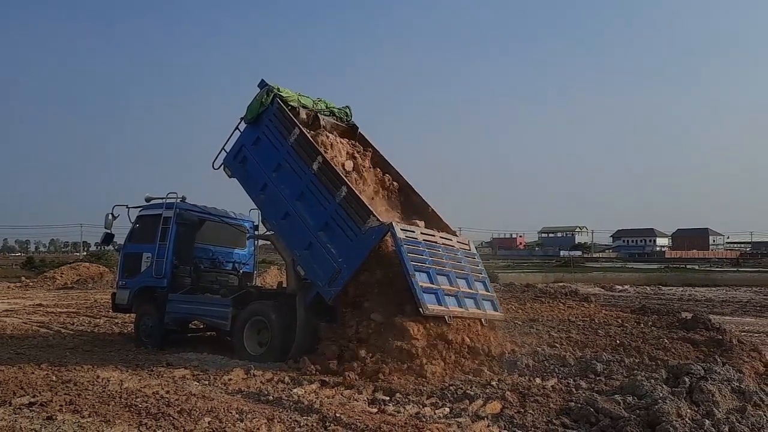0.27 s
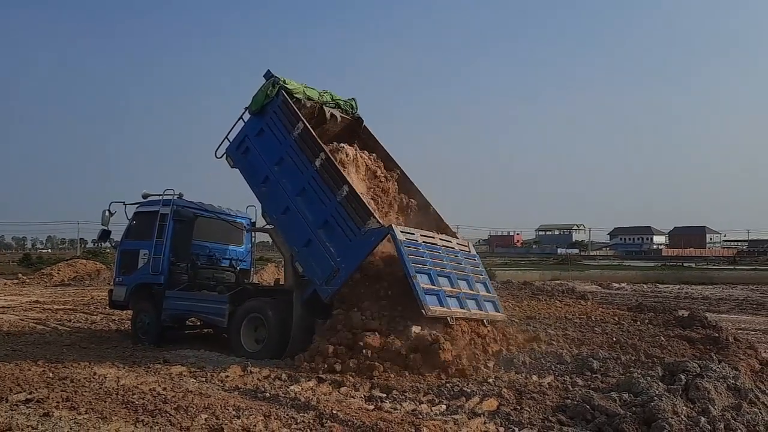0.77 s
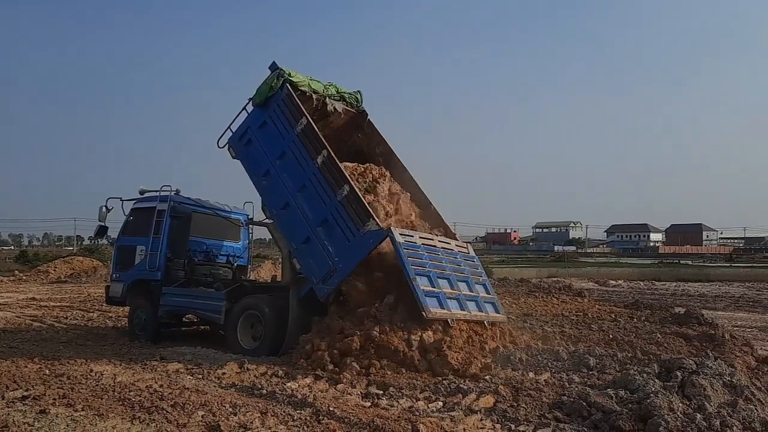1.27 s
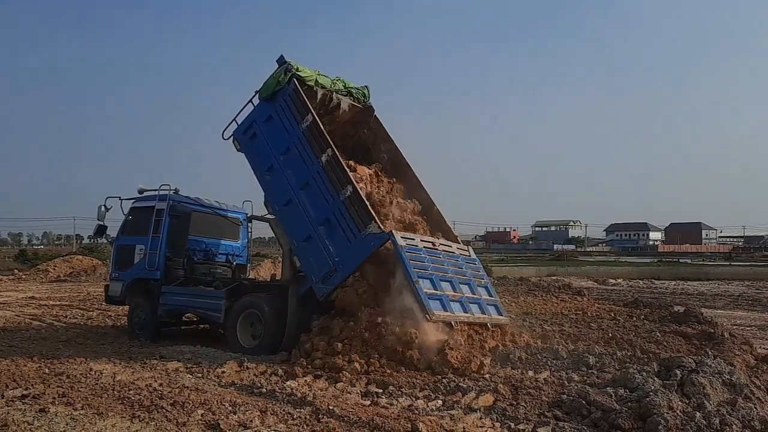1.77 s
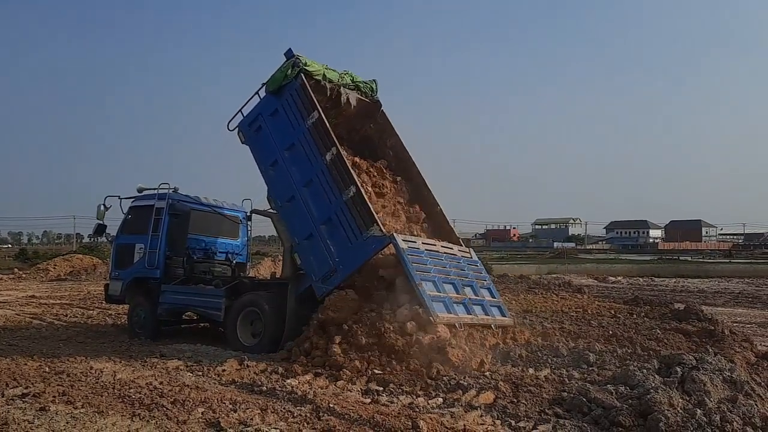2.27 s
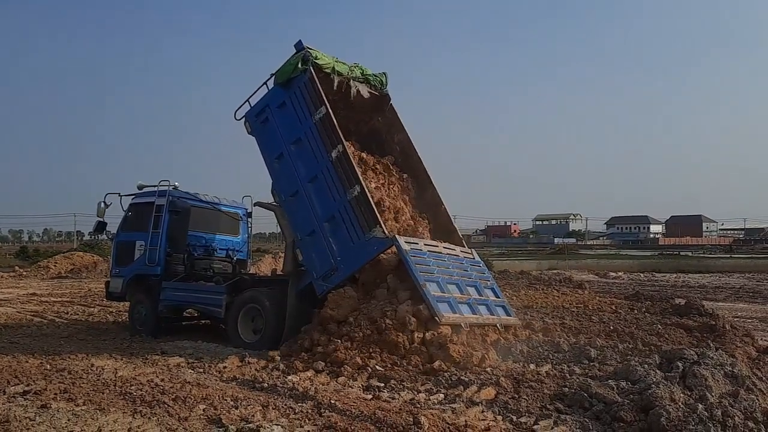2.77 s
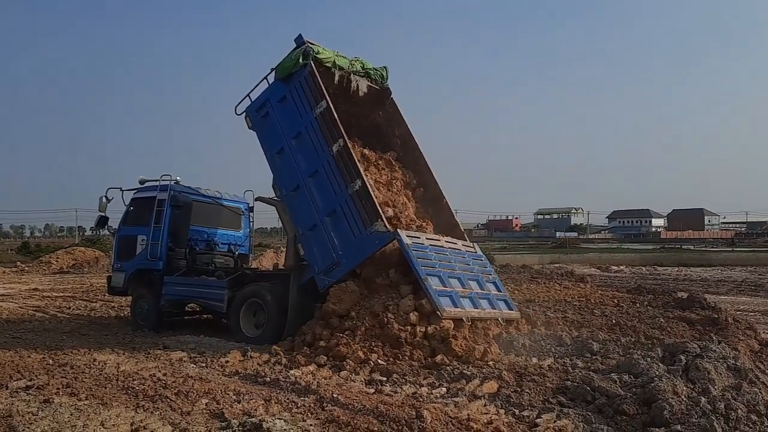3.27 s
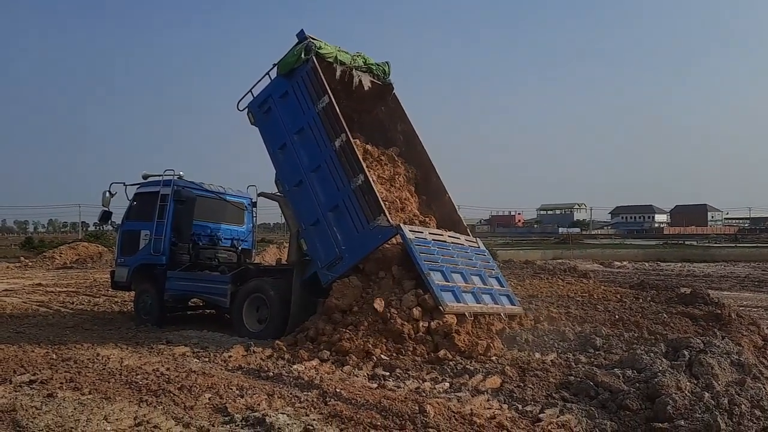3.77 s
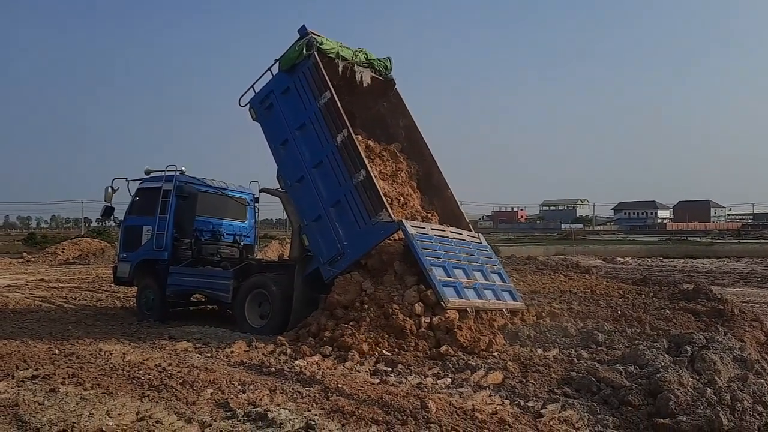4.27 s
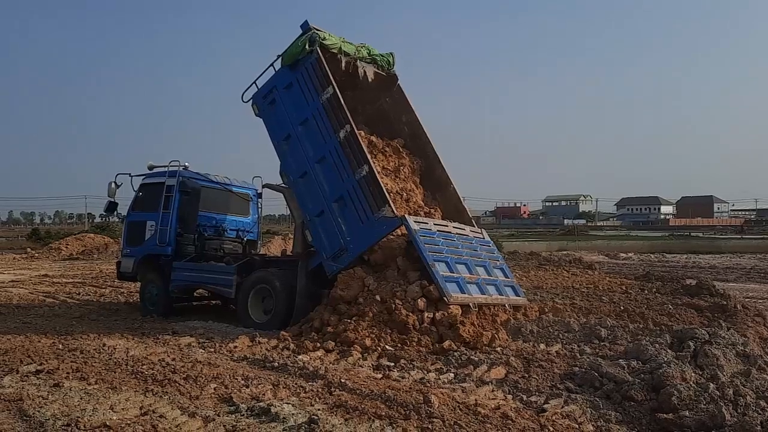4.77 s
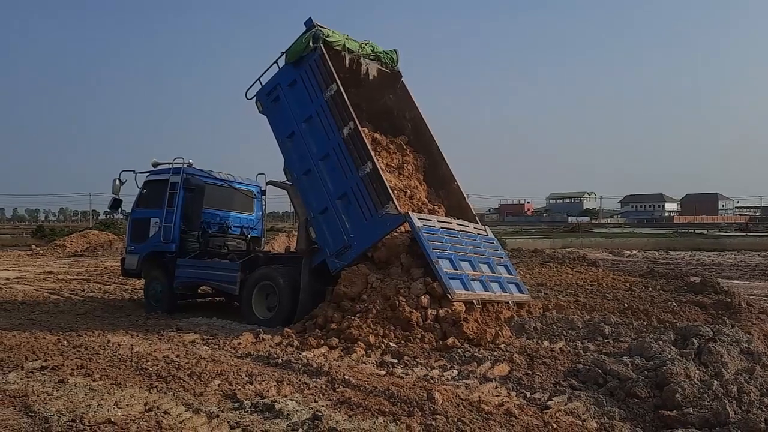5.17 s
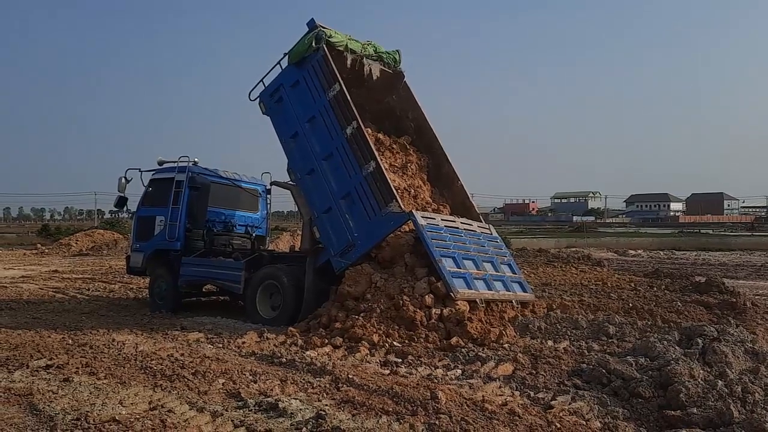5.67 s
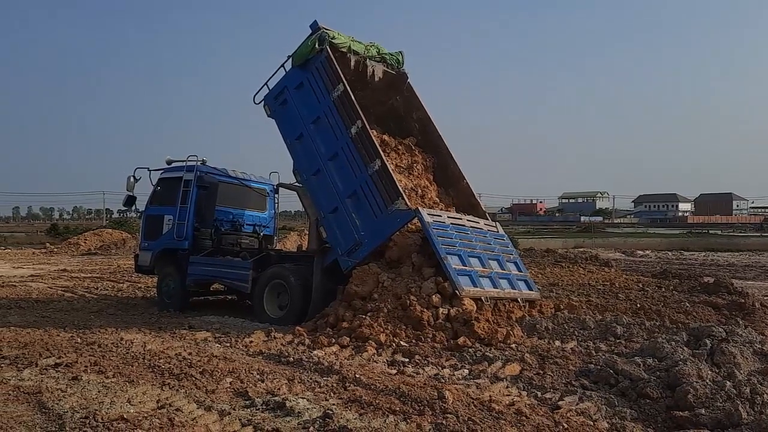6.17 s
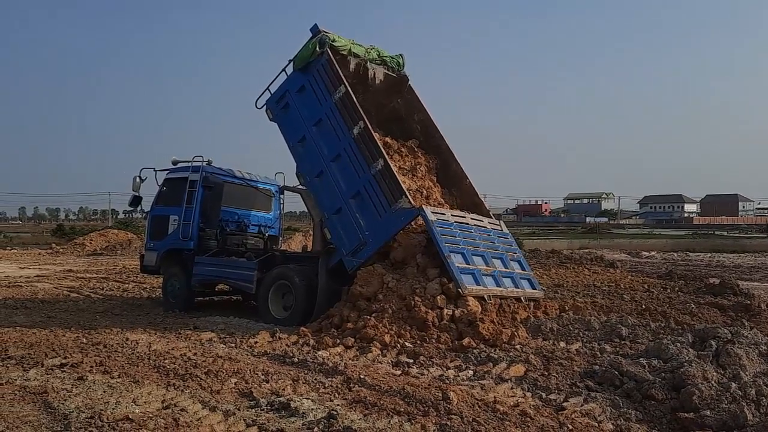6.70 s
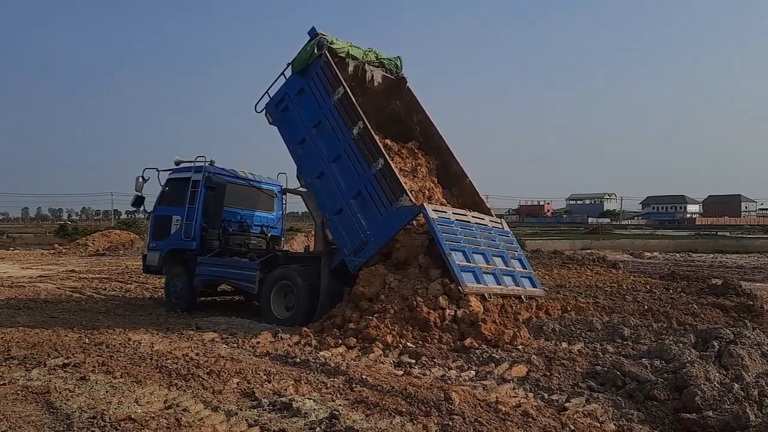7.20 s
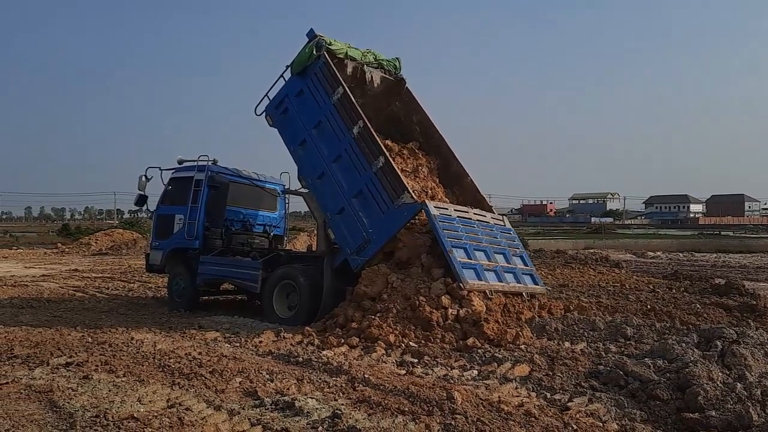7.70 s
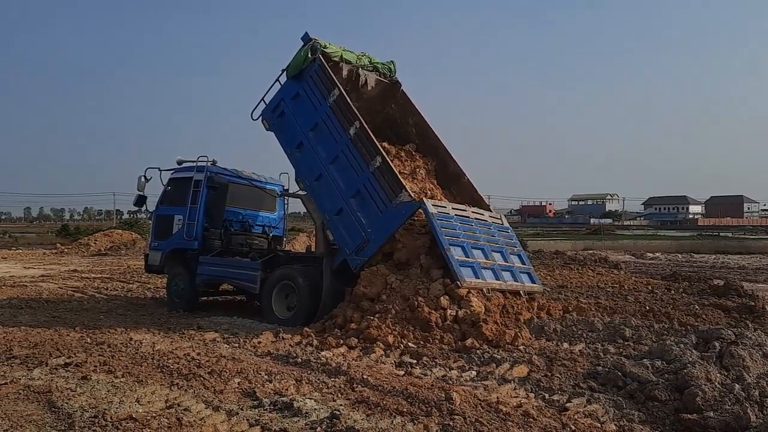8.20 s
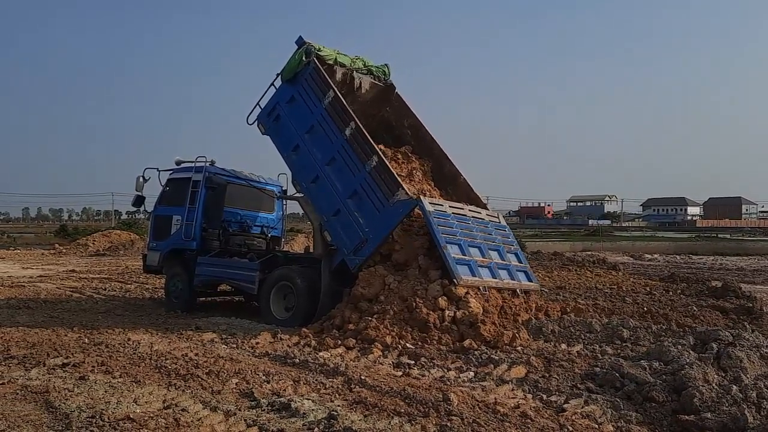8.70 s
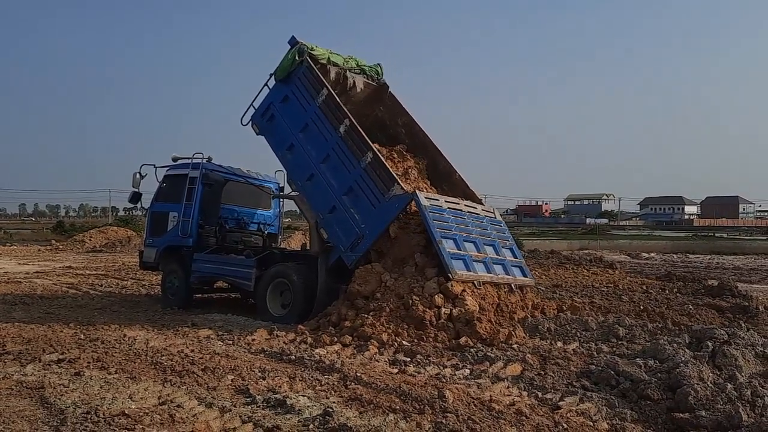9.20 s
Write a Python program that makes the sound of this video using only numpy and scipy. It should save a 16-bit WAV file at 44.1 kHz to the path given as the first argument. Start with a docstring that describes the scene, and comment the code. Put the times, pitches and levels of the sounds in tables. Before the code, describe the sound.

Outdoor stereo pickup at a fill site. First, earth slides and knocks from a steel tipper bed over low engine rumble, with track clanks and scrapes at left. The load thins, a few thumps and hinge squeaks follow, then it stops. A diesel revs, dips and climbs again, joined by a second wavering engine, as tracked machinery squeals, clatters and roars until the end.

```python
"""On an open fill site, two diesel engines rev while soil slides out of a tipper's steel bed; clods and stones
strike, low thumps fall and the tailgate hinge squeaks. From the left a tracked machine roars, clanks, squeals.
Engines are sums of harmonics, soil and roar are filtered noise, blows are damped resonances, and squeals are
wavering friction tones. Two spaced microphones: what comes from the left reaches the right one later."""
import sys
import numpy as np
from scipy import signal
from scipy.fft import rfft, irfft, next_fast_len
from scipy.io import wavfile
from scipy.ndimage import uniform_filter1d

SR = 44100
rng = np.random.default_rng(int(sys.argv[2]) if len(sys.argv) > 2 else 0)


def master(y):
    """Save y as 16-bit WAV."""
    cut = np.clip(np.atleast_2d(y).T, -1, 1)
    pcm = np.round(cut * 32767)  # scale
    wavfile.write(sys.argv[1], SR, pcm.astype(np.int16))


N = 416744
T = np.arange(N) / SR  # s
SIZE = next_fast_len(N + 64, True)
F = np.arange(SIZE // 2 + 1) * SR / SIZE + 1e-3  # Hz, kept above zero for the logarithm


def undb(db):
    """Level law: amplitude ratio for a level in dB."""
    return 10 ** (np.asarray(db) / 20)


def unit(x):
    """Normalization: scale to an effective value of one."""
    return x / np.sqrt(np.mean(x ** 2))


def white():
    """White noise: equal mean power at every frequency."""
    return rng.standard_normal(N)


def curves(table, off=None):
    """Linear interpolation: table columns become signals, with an optional value outside their span."""
    s, *columns = np.transpose(table)
    return [np.interp(T, s, c, off, off) for c in columns]


def walk(rate):
    """Slow random modulation: levels held 1 / rate s and smoothed twice, with a spread near 1."""
    k = int(SR / rate)
    held = np.repeat(rng.standard_normal(N // k + 1), k)
    return 1.57 * uniform_filter1d(uniform_filter1d(held, k), k)[:N]


def colour(x, spectrum):
    """Linear filtering: shape by (Hz, dB) points, with steep slopes outside them, then normalize."""
    hz, db = np.transpose(spectrum)
    octaves_outside = np.log2(np.minimum(F / hz[0], 1)) - np.log2(np.maximum(F / hz[-1], 1))
    gain_db = np.interp(np.log(F), np.log(hz), db) + 24 * octaves_outside
    return unit(irfft(rfft(x, SIZE) * undb(gain_db), SIZE)[:N])


def grains(rate, spread_db, share):
    """Granular noise: random decaying puffs of unequal size take a share of the power, steady noise the rest."""
    size_db = spread_db * np.minimum(rng.exponential(size=N), 2.8)
    impacts = (rng.random(N) < rate / SR) * undb(size_db)
    puffs = signal.lfilter([1], [1, -.994], impacts)
    return np.sqrt(share) * unit(puffs * white()) + np.sqrt(1 - share) * white()


def resonate(x, hz, q):
    """Resonance: pass a narrow band round one pitch."""
    return signal.lfilter(*signal.iirpeak(hz, q, SR), x)


def add(out, s, x):
    """Superposition: mix a short sound in at a time."""
    i = int(s * SR)
    out[i:i + len(x)] += x[:N - i]


def random_rings(rate, low_hz, high_hz, t60):
    """Free vibration: small bodies ring briefly at random times, pitches and strengths."""
    out, t = np.zeros(N), T[:int(t60 * SR)]
    shape = (1 - np.exp(-t / 0.01)) * undb(-60 * t / t60)
    for when, pitch, size in rng.random((int(rate * N / SR), 3)):
        hz = low_hz * (high_hz / low_hz) ** pitch
        add(out, when * T[-1], undb(16.0 * size) * shape * np.sin(2 * np.pi * hz * t))
    return out


def wide(make, alike):
    """Partial coherence: a broad source has a shared part and a part opposed between the microphones."""
    shared = np.sqrt((1 + alike) / 2) * make()
    return shared + np.sqrt((1 - alike) / 2) * make() * np.array([[1], [-1]])


# Loss on the path to the right microphone. Each row: frequency in Hz, loss in dB.
SHADE = [(100, -1), (400, 3), (700, 2), (1350, 1.35), (2500, 3.5), (5000, 3.5), (15000, 3.5)]
LAG_S, SQUEAL_LAG_S = 3.72e-4, 3.47e-4  # middle delay to the right microphone, for machines and track squeals
LAG_GAIN_S, LAG_GAINS_S = 1.8e-5, (3.8, 6.2)  # delay grows this much over this span: the machine moves round


def left(x, lag_s):
    """Propagation delay and shading: the far microphone hears a left source later and partly dulled."""
    hz, db = np.transpose(SHADE)
    path = rfft(x, SIZE) * undb(-np.interp(np.log(F), np.log(hz), db))

    def delayed(s):
        """Phase shift: a delay turns each frequency in proportion to its pitch."""
        return irfft(path * np.exp(-2j * np.pi * F * s), SIZE)[:N]

    moved = np.interp(T, LAG_GAINS_S, (0, 1))
    far = (1 - moved) * delayed(lag_s - LAG_GAIN_S / 2) + moved * delayed(lag_s + LAG_GAIN_S / 2)
    return np.array([x, far])


# Spectrum of the open air. Each row: frequency in Hz, relative density in dB per Hz.
AIR = [(300, -16), (1500, -33), (3000, 1.5), (6000, -10.5), (10000, -12), (15500, -12.5)]


def air():
    """Stationary noise: a faint steady background hiss."""
    return colour(white(), AIR) * undb(-44.5)


# Steady noises. Each row: time in seconds, rumble level in dB, roar level in dB, both before each part's trim.
NOISE = [(0.0, -27.5, -40.5), (0.73, -28.5, -36.5), (0.79, -37.5, -45), (1.29, -38, -44), (1.39, -32, -40),
         (1.9, -32, -43), (2.9, -29.5, -49), (3.37, -32.5, -44), (3.55, -24.5, -41.5), (4.62, -32.5, -35.5),
         (4.69, -31, -36.5), (4.85, -28.5, -38.5), (5.03, -25.5, -37.5), (6.84, -22.5, -32),
         (9.45, -20, -32)]
# Spectrum of the rumble. Each row: frequency in Hz, relative density in dB per Hz.
RUMBLE = [(25, -12), (45, -12), (70, 0), (130, -1), (200, -4), (270, -11), (400, -20)]


def rumble(rumble_db, throb_db):
    """Low-frequency noise with amplitude modulation: the site rumbles and throbs."""
    return colour(white(), RUMBLE) * undb(rumble_db - 2.0 + throb_db)


# Spectrum of the machine roar. Each row: frequency in Hz, relative density in dB per Hz.
ROAR = [(200, -6.5), (390, 12), (540, 0.5), (880, 8.5), (1250, 6), (1700, 4.5), (2000, 4), (2380, -4),
        (2620, -2), (2950, -1), (3150, -13.5), (3600, -8), (4200, -19), (6500, -20.5), (15000, -45.5)]
# What the earth heaps return of the roar. Each row: frequency in Hz, relative gain in dB.
HEAPS = [(200, 5.5), (550, 5), (800, 0.5), (1400, -3), (2000, -4.5), (2400, 6.5), (2800, -6.5), (3500, 3.5),
         (15000, 9)]


def heaps(roar_db):
    """Diffuse reflection: separate noise stands for the roar returned by the earth heaps."""
    return colour(colour(white(), ROAR), HEAPS) * undb(roar_db + 2.0)


# Sliding load. Each row: time in seconds, clods level in dB, fine soil level in dB, before each part's trim.
SOIL = [(0.0, -26, -36.5), (0.13, -28.5, -38), (0.19, -27.5, -32), (0.27, -28, -38.5), (0.42, -26, -34.5),
        (0.52, -26.5, -34.5), (0.6, -27, -32.5), (0.75, -29, -32), (0.82, -29.5, -34.5),
        (1.53, -31.5, -45.5), (2.4, -32, -49.5), (2.87, -30.5, -49), (3.01, -31, -42), (3.5, -46.5, -69)]
# Spectrum of the clods. Each row: frequency in Hz, relative density in dB per Hz.
CLODS = [(200, -30), (390, 0), (560, -5.5), (850, -8), (1100, -8.5), (1700, -9.5), (2000, -23.5),
         (2400, -10), (2800, -24.5), (3500, -17), (6000, -36)]


def clods(clods_db, clumps_db, surges_db):
    """Granular flow: coarse lumps tumble as dense random puffs."""
    return colour(grains(160, 2.8, 0.33), CLODS) * undb(clods_db + 0.4 * clumps_db + surges_db)


def pebbles(clods_db):
    """Impact excitation: stones ring the bed as they slide."""
    return colour(random_rings(60, 402.5, 3437, 0.073), CLODS) * undb(clods_db - 10.5)


# Spectrum of the fine soil. Each row: frequency in Hz, relative density in dB per Hz.
FINES = [(1200, 2), (2400, 13), (3600, 6), (5500, 8.5), (8000, 6), (10500, 2), (12000, -4.5), (15500, 0)]


def fines(fines_db, clumps_db):
    """Granular flow: fine soil hisses as smaller, more even puffs."""
    return colour(grains(140, 1.6, 0.26), FINES) * undb(fines_db + 5.5 + clumps_db)


def grit(fines_db, clumps_db):
    """Impact excitation: small stones ping off the steel."""
    return colour(random_rings(220, 1502, 10000, 0.025), FINES) * undb(fines_db - 3.0 + clumps_db)


# Spectrum of the droning bed. Each row: frequency in Hz, relative density in dB per Hz.
SLIDE = [(560, -14), (680, -2.5), (900, -2), (1080, -14)]


def drone(clods_db, surges_db):
    """Forced vibration: the bed drones under the sliding load."""
    return colour(grains(80, 3.5, 0.4), SLIDE) * undb(clods_db - 7.5 + surges_db)


# Low thumps: lumps of earth and chugs of the lugging engine. Each row: start in seconds, level in dB before
# the envelope, pitch in Hz.
THUMPS = [(0.41, -17, 83.4), (0.559, -10.5, 392), (0.599, -29, 80.7), (0.678, -10.5, 390),
          (0.719, -23, 380), (0.746, -17, 425), (2.238, -17, 392), (2.368, -20.5, 146), (2.429, -16.5, 368),
          (2.548, -16, 116), (2.589, -18, 102), (2.63, -21, 116.7), (2.689, -21, 72.7), (2.809, -17, 142),
          (2.836, -15, 114), (2.52, -18, 378), (2.6, -19, 406), (2.642, -17, 390), (2.888, -13, 372),
          (2.904, -11.5, 390), (2.98, -18.5, 132), (3.028, -19, 385), (3.345, -20, 380), (3.53, -18, 386),
          (3.582, -18, 394.7), (4.752, -16, 145), (4.859, -14.5, 75.6), (5.25, -19, 76), (5.352, -15, 145),
          (6.19, -13, 330.2), (7.005, -7, 201), (7.075, -10, 382.5), (7.152, -12, 387.6),
          (7.223, -7, 369.7), (7.345, -15, 298), (8.75, -13, 383.3), (8.92, -8.5, 370), (9.03, -11, 401)]


def thumps():
    """Heavy damping: each thump gives a few cycles, its decay set in periods of its own pitch."""
    out, t = np.zeros(N), T[:SR // 5]
    for s, db, hz in THUMPS:
        shape = (1 - np.exp(-t * hz / 0.47)) * np.exp(-t * hz / 1.94)
        add(out, s, undb(db) * shape * np.sin(2 * np.pi * hz * t))
    return out


# Clods that strike the bed. Each row: start in seconds, strength in dB.
KNOCKS = [(0.09, -13), (0.361, -14), (1.299, -21), (1.672, -12.5), (1.806, -4.5)]
# Modes of the loaded bed. Each row: frequency in Hz, relative level in dB, time to fall 60 dB in seconds.
BED = [(664, -5, 0.075), (851, -14.5, 0.097)]


def knocks():
    """Modal vibration: clods ring the low modes of the loaded bed."""
    out, t = np.zeros(N), T[:SR // 4]
    ring = sum(undb(db - 60 * t / t60) * np.sin(2 * np.pi * hz * t) for hz, db, t60 in BED)
    for s, db in KNOCKS:
        add(out, s, undb(db) * (1 - np.exp(-t / 0.0014)) * ring)
    return out


def clanks(table, burst_db, t60):
    """Struck resonance: each blow rattles a broad ring round its own pitch, over a wider burst."""
    out, t = np.zeros(N), T[:SR // 4]
    body = colour(colour(white(), ROAR), [(500, 0.5), (3000, 8.0), (5000, 6.2)])
    shape = (1 - np.exp(-t / 0.0011)) * undb(-60 * t / t60)
    for s, db, hz in table:
        ring = unit(resonate(rng.standard_normal(len(t)), hz, 12.0))
        burst = np.resize(body[int(s * SR):], len(t))
        add(out, s, undb(db - 6.5) * shape * (ring + undb(burst_db) * burst))
    return out


# Stones that crack on the bed. Each row: start in seconds, nominal level in dB, ring pitch in Hz.
STONES = [(1.58, -22.5, 1300), (1.648, -19.5, 3980), (1.752, -24, 4448), (1.872, -27.5, 3580)]


def stones():
    """Impact excitation: stones crack on the bed with a short coloured ring."""
    return clanks(STONES, burst_db=0.0, t60=0.15)


# Fainter tones over each squeal. Each row: distance above the pitch in Hz, relative level in dB.
ABOVE = [(2350, -31), (3700, -38), (4700, -19.5), (7050, -28), (9400, -27)]
SLIP_ATTACK_S, SLIP_RELEASE_S = 0.006, 0.0085  # a squeal swells in, holds, then dies with this time constant
SLIP_RING_DB, SLIP_RING_S = -10, 0.025  # the steel rings on faintly
SLIP_LEAD_DB, SLIP_LEAD_S = -17, 0.014  # a faint whisper grows in before the steel bites
SLIP_SAG = 0.004  # share by which the pitch sinks from start to end
FIRM_DB = -18  # the fainter a slip is under this level, the more it drops out


def squeals(table, rough_db, waver, blur_db, dropout, upper_db):
    """Stick-slip friction: steel sings on one mode inside a noisy blur, with fainter, rougher tones above."""
    out = np.zeros(N)
    flutter = undb(-rough_db * np.abs(walk(90)))
    drift = 0.7 * walk(200) + 0.8 * walk(40)
    fray = walk(500)
    chatter = np.maximum(walk(70), 0)
    grind = colour(white(), [(4000, 5), (15500, -11)])  # the same contact also hisses
    for start, hold, hz, db in table:
        held = SLIP_ATTACK_S + hold
        first = max(int((start - 4 * SLIP_LEAD_S) * SR), 0)
        last = min(int((start + held + 4 * SLIP_RING_S) * SR), N)
        i = slice(first, last)
        t = T[i] - start
        after = np.maximum(t - held, 0)

        sag = SLIP_SAG * (.5 - np.clip(t / held, 0, 1))
        turn = 2 * np.pi * hz * np.cumsum(1 + waver * drift[i] + sag) / SR
        upper = undb(-29) * np.sin(2 * turn)
        upper = upper + sum(undb(d) * np.sin(turn + 2 * np.pi * up_hz * t) for up_hz, d in ABOVE)
        tone = (1 + undb(blur_db) * fray[i]) * np.sin(turn)
        tone += undb(upper_db) * (1 + .4 * fray[i]) * upper
        tone += undb(upper_db - 29) * grind[i]

        attack = np.clip(t / SLIP_ATTACK_S, 0, 1)
        decay = np.exp(-after / SLIP_RELEASE_S) + undb(SLIP_RING_DB) * np.exp(-after / SLIP_RING_S)
        lead = undb(SLIP_LEAD_DB) * np.exp(np.minimum(t, 0) / SLIP_LEAD_S)
        shape = attack ** 0.87 * decay + lead * np.clip(1 - t / SLIP_ATTACK_S, 0, 1)
        level = undb(db - dropout * max(FIRM_DB - db, 0) * chatter[i])
        out[i] += np.sqrt(2) * level * shape * flutter[i] * tone
    return out


# Slips of the tailgate hinge. Each row: start in seconds, hold in seconds, pitch in Hz, nominal level in dB.
HINGE = [(1.415, 0.0072, 4990, -37.5), (2.09, 0.025, 3343, -25.5), (2.132, 0.015, 3176, -22),
         (2.205, .05, 4770, -45), (2.295, 0.039, 4750, -42.5), (2.422, 0.018, 4430, -27.5),
         (2.49, 0.046, 4450, -38), (2.572, 0.054, 4440, -34.5), (2.65, 0.026, 4440, -36.5),
         (2.715, 0.045, 4440, -46), (2.795, 0.0089, 4450, -38.5)]


def hinge():
    """Stick-slip friction: the tailgate hinge squeaks with a fairly pure tone."""
    return squeals(HINGE, rough_db=2.0, waver=0.0021, blur_db=-21, dropout=0.05, upper_db=-5.5)


# Unequal cylinders. Each row: order in thirds of the firing rate, level in dB relative to the tones.
UNEVEN = [(2, -10.5), (4, -7.5), (5, -5.5), (7, -8.5), (8, -11.5), (9, -18)]
PIPE_HZ, PIPE_WIDTH_HZ, PIPE_DB = 116.3, 24, 6.5  # the exhaust pipe lifts whichever uneven line crosses it


def engine(table, uneven_db):
    """Harmonic series: exhaust tone and octave, with wavering lines at thirds of the firing rate."""
    hz = curves(table)[0]
    tone_db, octave_db = curves(table, off=-90)[1:]
    turn = 2 * np.pi * np.cumsum(hz) / SR + 0.09 * walk(20)
    out = undb(tone_db + 1.0 * walk(14)) * np.sin(turn)
    out += undb(octave_db + 1.5 * walk(14)) * np.sin(2 * turn)
    drive_db = (tone_db + octave_db) / 2 + uneven_db
    for thirds, db in UNEVEN:
        pipe_db = PIPE_DB / (1 + (2 * (thirds * hz / 3 - PIPE_HZ) / PIPE_WIDTH_HZ) ** 2)
        line_db = drive_db + db + pipe_db + 1.5 * walk(4)
        out += undb(line_db) * np.sin(thirds * turn / 3 + 0.4 * walk(3))
    return np.sqrt(2) * out


# First engine: revs up, then holds near 86 Hz. Each row: time in seconds, firing rate in Hz,
# firing tone in dB, second harmonic in dB.
FIRST_ENGINE = [(0, 84.3, -38.5, -48), (0.7, 86.2, -32.5, -48), (0.86, 62, -49, -70), (1.5, 59.4, -49, -32),
                (1.8, 57.2, -37, -41), (2.1, 47, -56, -61), (3.28, 45.24, -50, -38.5),
                (3.36, 46.4, -48, -27), (3.5, 49.5, -45, -26.5), (3.65, 62.6, -32, -22.5),
                (3.8, 68.6, -27.5, -36), (4.05, 73.8, -29.5, -33), (4.55, 70.2, -31, -32.5),
                (4.64, 69.1, -36, -39), (4.69, 66, -50, -54), (4.82, 61, -32, -50), (4.89, 60.2, -36, -23),
                (4.94, 59.6, -48, -45), (5.01, 59.6, -40, -23), (5.07, 60, -47, -43),
                (5.14, 60.46, -47, -25.5), (5.19, 61.96, -49, -37), (5.25, 64.5, -26, -24),
                (5.32, 67.3, -46, -44), (5.45, 72.66, -26.5, -30), (6.05, 88.9, -17, -38.5),
                (6.25, 90.7, -20, -58), (6.8, 85.73, -22.5, -38), (7.1, 89.4, -17.5, -32),
                (7.7, 85.37, -23, -41), (8.0, 82.5, -23, -40), (8.6, 86.67, -19, -38),
                (9.0, 85.84, -24, -42), (9.45, 85.84, -26.5, -60)]


def first_engine():
    """Periodic combustion: the first engine revs up, then holds near 86 Hz."""
    return engine(FIRST_ENGINE, uneven_db=-2.5)


# Casing resonances. Each row: frequency in Hz, width in Hz, gain in dB at the peak.
CASING = [(2190, 110, 6), (2860, 90, 2), (3030, 90, 6), (3230, 60, -4)]
WHINE_PER_FIRING, WHINE_DB = 45.3, -43.5  # multiple of the first engine's firing rate; level before casing gain
WHINE_AT_HZ_PER_S, WHINE_ENDS_S = 15, 4.1  # climb of firing rate that gives full drive; end of the whine


def whine():
    """Gear meshing: a thin unsteady tone as the first engine gains speed, swelling at casing resonances."""
    hz = curves(FIRST_ENGINE)[0]
    climb = uniform_filter1d(np.gradient(hz) * SR, size=SR // 10) / WHINE_AT_HZ_PER_S
    load = np.clip(climb, 0, 1) * (T < WHINE_ENDS_S)
    pitch = WHINE_PER_FIRING * hz
    casing = sum(undb(db) / (1 + (2 * (pitch - f) / width) ** 2) for f, width, db in CASING)
    turn = 2 * np.pi * np.cumsum(pitch * (1 + 0.003 * walk(55))) / SR
    return np.sqrt(2) * load * casing * undb(WHINE_DB + 2.8 * walk(30)) * np.sin(turn)


# Second engine: enters later, its pitch dipping and climbing. Each row: time in seconds, firing rate in Hz,
# firing tone in dB, second harmonic in dB.
SECOND_ENGINE = [(4.35, 52.6, -50, -60), (4.52, 53.6, -27, -50), (4.63, 54, -40, -50),
                 (4.68, 54.34, -60, -60), (5.4, 58.86, -44, -46), (5.55, 62.1, -26, -37),
                 (5.8, 61.6, -48, -49), (6.03, 58.95, -40, -50), (6.14, 64.6, -19, -44),
                 (6.3, 71.6, -45, -58), (6.85, 83.2, -56, -41), (7.1, 78.7, -47, -39),
                 (7.4, 70.2, -19, -37), (7.65, 59.26, -24, -35), (7.95, 50.5, -37, -33),
                 (8.2, 60.57, -22.5, -39), (8.5, 66.56, -23, -40), (8.7, 70.73, -20, -35),
                 (8.85, 76.1, -23, -35), (9.0, 79.6, -31, -42), (9.2, 79.5, -28, -52), (9.45, 82, -23, -50)]


def second_engine():
    """Periodic combustion: the second engine enters later, its pitch dipping and climbing."""
    return engine(SECOND_ENGINE, uneven_db=-6.0)


FLICKER_DB = 1.2  # spread of each part of the roar
FIRING_BEAT = 0.2  # share by which the roar pulses with each firing of the first engine


def roar(roar_db):
    """Modulated broadband noise: diesel clatter and track noise flicker apart in three bands."""
    full = colour(grains(120, 3.7, 0.34), ROAR)
    low, mid = (signal.lfilter(*signal.butter(2, hz, fs=SR), full) for hz in (700., 2300.))
    bands = (low, 16), (mid - low, 14), (full - mid, 12)  # each with its flicker rate
    parts = sum(part * undb(FLICKER_DB * walk(rate)) for part, rate in bands)
    beat = 1 + FIRING_BEAT * np.cos(2 * np.pi * np.cumsum(curves(FIRST_ENGINE)[0]) / SR)
    return parts * beat * undb(roar_db + 7.5 + .8 * walk(15))


def loose_steel(roar_db):
    """Free vibration: loose steel parts ring briefly at random pitches."""
    return colour(random_rings(90, 900.2, 3800, 0.11), ROAR) * undb(roar_db)


# Link clanks. Each row: start in seconds, nominal level in dB, ring pitch in Hz.
CLANKS = [(0.039, -19, 2980), (0.093, -21, 1040), (0.172, -14, 2030), (0.4184, -18.5, 2040),
          (0.445, -22, 3370), (0.5694, -21, 2010), (0.6, -22, 2760), (0.8, -21, 1200),
          (0.9522, -23.5, 2264), (4.363, -22, 2056), (4.498, -24, 1960), (4.9652, -19.5, 2020),
          (6.0834, -22, 2655), (6.3347, -22, 2110), (6.733, -20, 2025), (6.776, -20, 2017),
          (7.097, -12.5, 1900), (7.5199, -21, 1698), (7.651, -30, 1970), (7.824, -20.5, 1955),
          (8.0217, -24, 2170), (8.369, -20, 1850), (8.4979, -18, 2014), (8.9027, -17, 1814),
          (9.1672, -19, 1760), (9.25, -20.5, 2967)]


def links():
    """Struck resonance: the track links clank."""
    return clanks(CLANKS, burst_db=5.5, t60=0.19)


# Dry steel scrapes. Each row: start in seconds, length in seconds, nominal level in dB, strongest pitch in Hz.
SCRAPES = [(0.24, .03, -34, 9180), (0.29, 0.06, -34, 9140), (0.38, 0.092, -20, 5600),
           (0.542, .04, -24, 5800), (0.64, 0.048, -19, 9220), (0.883, 0.06, -25, 7900),
           (1.64, .036, -30, 9900), (1.746, 0.046, -24, 7060), (1.87, .036, -31, 6900),
           (2.01, 0.03, -26, 7100), (2.095, .02, -27, 7800), (3.015, 0.032, -26, 7470),
           (3.04, .05, -25, 8780), (3.1058, 0.029, -33, 8860), (3.979, .03, -34, 6010),
           (4.124, 0.035, -19, 5400), (4.2304, .015, -25, 11900), (4.418, .1, -26.5, 10420),
           (4.808, 0.048, -40, 8600), (4.886, .025, -28, 10700), (4.96, .09, -35, 10800),
           (5.147, 0.039, -27, 8470), (5.277, 0.095, -30, 8890), (5.485, .015, -27, 6990),
           (5.518, 0.13, -26.5, 11130), (5.812, 0.035, -25, 8110), (6.07, 0.033, -34, 5290),
           (6.211, 0.038, -23, 13400), (6.299, 0.032, -27, 13410), (6.523, .036, -34, 8720),
           (7.376, 0.019, -32, 4466), (7.5175, 0.031, -35, 10610), (8.02, 0.0077, -14, 4650),
           (8.03, .025, -27, 11110), (8.06, 0.049, -33, 10700), (8.2767, .04, -21, 10660),
           (8.323, 0.047, -24, 10350), (8.362, 0.013, -20, 5230), (8.463, 0.099, -30.5, 11510),
           (8.769, 0.062, -29, 11300), (8.835, .02, -29, 14840), (9.0995, .07, -34, 10840),
           (9.337, 0.068, -25, 10300), (9.4057, 0.046, -25, 10370)]


def scrapes():
    """Dry friction noise: bright bursts, strongest round one pitch and streaked by a few narrow rings."""
    out, t = np.zeros(N), T[:SR // 4]
    hiss = colour(white(), [(3500, 15.5), (6000, 1.0), (11000, -0.5), (15500, 0)])
    hiss = hiss * undb(2.3 * walk(120))
    for s, length, db, hz in SCRAPES:
        noise = np.resize(hiss[int(s * SR):], len(t))
        rings = sum(resonate(noise, 4000 * 3.7 ** p, 45.0) for p in rng.random(5))
        scrape = noise + undb(7.0) * resonate(noise, hz, 14.0) + undb(0.5) * rings
        shape = (1 - np.exp(-t / 0.0028)) * np.exp(-(t / length) ** 3)
        add(out, s, undb(db - 10.5) * shape * scrape)
    return out


# Slips of the track. Each row: start in seconds, hold in seconds, pitch in Hz, nominal level in dB.
TRACK = [(0.055, 0.019, 5130, -36), (0.162, 0.046, 1960, -25.5), (0.162, .012, 1450, -22),
         (0.245, 0.018, 5100, -32), (0.318, .022, 5700, -26.5), (0.55, 0.034, 1990, -21.5),
         (0.585, 0.034, 7700, -37), (0.675, 0.022, 6060, -32), (0.745, .01, 11400, -42),
         (0.8, .04, 2290, -38), (0.95, .008, 9100, -38), (0.692, .012, 3070, -29), (1.012, .03, 1630, -26),
         (1.02, 0.071, 2290, -35), (1.03, .012, 3600, -33), (1.5, 0.022, 2690, -38),
         (1.575, 0.023, 1310, -33), (1.125, .06, 6760, -40), (1.275, .035, 8800, -39),
         (3.24, .03, 2800, -45), (3.825, 0.036, 3800, -41), (4.128, 0.032, 3733, -33.5),
         (4.175, .04, 3720, -38), (4.13, .015, 3060, -40), (4.392, 0.016, 5740, -38),
         (4.415, 0.037, 5860, -23.5), (4.445, 0.032, 5860, -19.5), (4.49, 0.025, 5820, -25),
         (4.808, 0.063, 5490, -27), (4.895, 0.038, 5490, -40), (4.918, 0.014, 6550, -33),
         (4.936, .01, 6300, -32), (5.055, .008, 6200, -41), (4.948, 0.019, 6200, -24),
         (4.985, 0.0082, 6280, -22), (5.002, 0.03, 6180, -23), (5.01, 0.042, 2490, -28),
         (5.01, .04, 3730, -36), (5.152, 0.011, 4210, -28.5), (5.27, 0.037, 4262, -33),
         (5.29, .03, 6200, -46), (5.43, 0.038, 6350, -46), (5.495, 0.026, 6265, -41),
         (5.52, 0.021, 4250, -32), (5.55, 0.025, 4210, -31), (5.812, 0.0068, 3630, -30.5),
         (5.942, 0.0077, 4856, -23.5), (6.1, .02, 3770, -35), (6.148, 0.017, 3700, -33),
         (6.205, .015, 5020, -38), (6.59, .015, 5800, -48), (6.68, .01, 5050, -46),
         (6.842, 0.038, 6517, -26), (6.898, 0.061, 6500, -26.5), (6.95, 0.0096, 4426, -33),
         (6.965, 0.036, 5200, -39), (7.03, .012, 4730, -38), (7.445, 0.041, 5906, -47),
         (7.515, 0.0061, 5870, -23), (7.529, 0.004, 5860, -27), (7.538, 0.014, 5870, -35),
         (7.559, 0.0038, 5870, -41), (7.635, .012, 5815, -47), (7.865, 0.031, 4797, -38),
         (7.92, 0.035, 5250, -29.5), (8.027, 0.015, 5550, -24), (8.03, .006, 5120, -32),
         (8.06, 0.022, 6030, -24), (8.105, 0.0076, 4990, -35), (8.127, 0.005, 4970, -29),
         (8.13, 0.006, 5450, -37), (8.168, 0.0058, 4980, -43), (8.19, 0.072, 6100, -38),
         (8.212, 0.087, 5285, -31.5), (8.265, 0.014, 5880, -15), (8.285, 0.019, 5950, -16),
         (8.323, 0.03, 5965, -17.5), (8.362, 0.0073, 5660, -24), (8.455, 0.019, 6570, -35),
         (8.49, .02, 5450, -39), (8.53, 0.0073, 5390, -26), (8.5, 0.032, 5970, -38), (8.66, .04, 5450, -42),
         (8.53, 0.041, 6620, -36), (8.6, 0.038, 6570, -44), (8.69, 0.076, 3250, -36),
         (8.65, 0.072, 6070, -38), (8.74, .12, 6000, -43), (8.685, .025, 7230, -44),
         (8.79, 0.055, 7120, -44), (8.97, .012, 4620, -39), (8.97, .02, 3100, -33),
         (8.738, 0.01, 5400, -35), (8.78, 0.018, 5620, -33), (8.808, 0.02, 5430, -32.5),
         (9.092, 0.011, 6080, -22.5), (9.115, .012, 5990, -26), (9.145, 0.015, 6010, -24.5),
         (9.168, 0.11, 6690, -36), (9.165, 0.0055, 5100, -34), (9.19, 0.0055, 5133, -34),
         (9.35, 0.029, 5080, -36), (9.435, .008, 4996, -34), (9.34, 0.013, 5686, -22),
         (9.357, 0.022, 5620, -20), (9.4, .02, 5740, -23.5), (9.422, 0.022, 5810, -26)]


def track_squeals():
    """Stick-slip friction: the track steel squeals, with more waver and blur than the hinge."""
    return squeals(TRACK, rough_db=2.0, waver=0.004, blur_db=-12, dropout=0.3, upper_db=2)


BED_LEFT_DB = 0.6  # level by which bed and broad sources are louder on the left


def scene():
    """Superposition: broad background, the load in its bed, and the machines from the left."""
    rumble_db, roar_db = curves(NOISE)
    clods_db, fines_db = curves(SOIL, off=-88)
    clumps_db, surges_db = 2.2 * walk(18), 0.61 * walk(5.8)  # the load lets go in clumps and slower surges
    throb_db = 2.0 * walk(12) + 1.5 * walk(25)  # the rumble throbs alike on both sides

    spread = wide(air, 0.038) + wide(lambda: rumble(rumble_db, throb_db), 0.42)
    spread += wide(lambda: heaps(roar_db), 0.31)
    spread += wide(lambda: clods(clods_db, clumps_db, surges_db), 0.25)
    spread += wide(lambda: fines(fines_db, clumps_db), 0.069)

    bed = drone(clods_db, surges_db) + pebbles(clods_db) + grit(fines_db, clumps_db)
    bed += thumps() + knocks() + stones() + hinge()

    machines = first_engine() + whine() + second_engine()
    machines += roar(roar_db) + loose_steel(roar_db) + links() + scrapes()
    balance = undb([[BED_LEFT_DB / 2], [-BED_LEFT_DB / 2]])
    return (bed + spread) * balance + left(machines, LAG_S) + left(track_squeals(), SQUEAL_LAG_S)


def record(dry):
    """Low-pass filtering: the recorder cuts the top steeply above 15.8 kHz."""
    return signal.sosfilt(signal.ellip(10, .2, 80, 15800, fs=SR, output="sos"), dry)


dry = scene()
out = record(dry)
master(out)
```